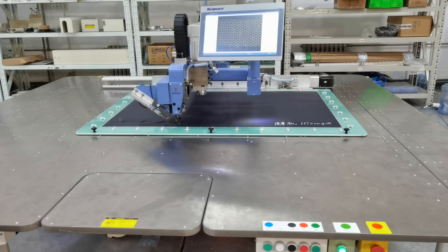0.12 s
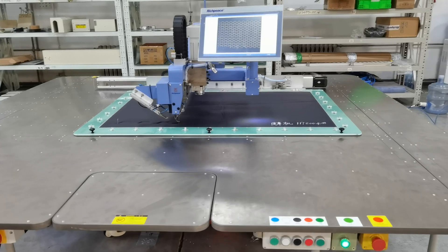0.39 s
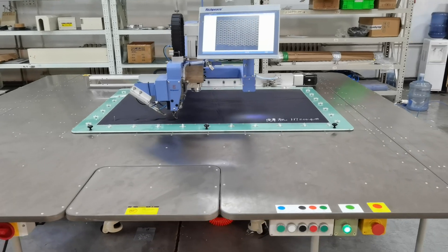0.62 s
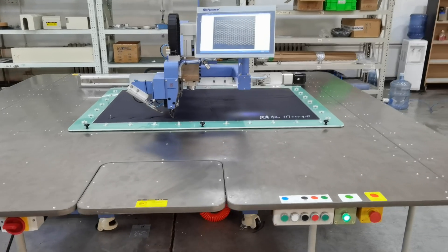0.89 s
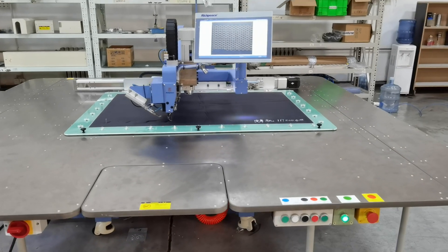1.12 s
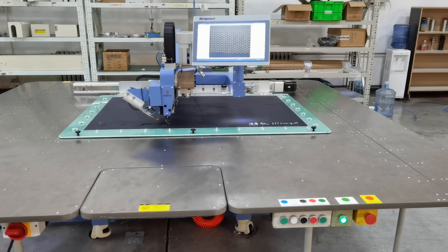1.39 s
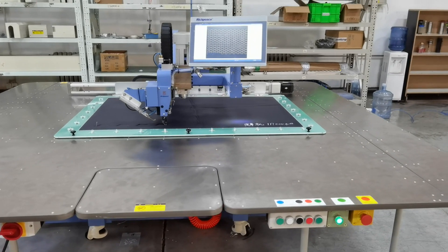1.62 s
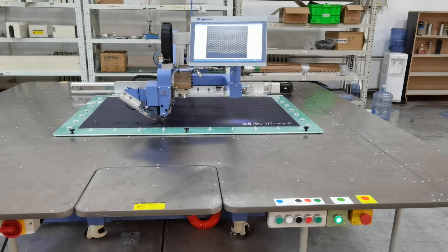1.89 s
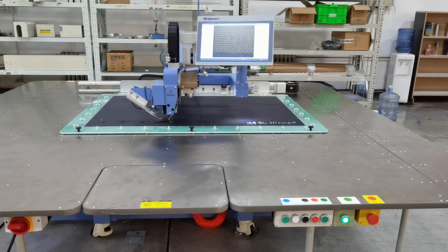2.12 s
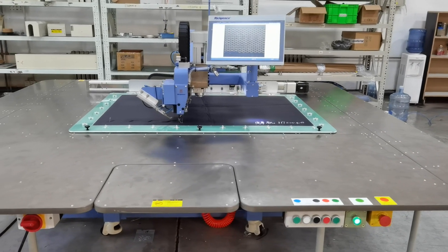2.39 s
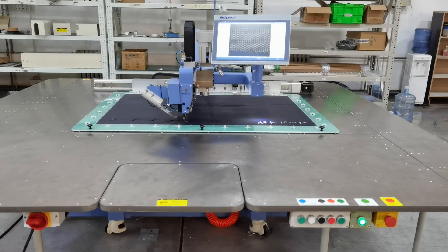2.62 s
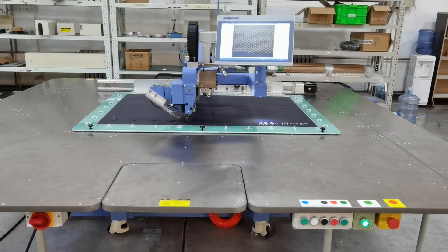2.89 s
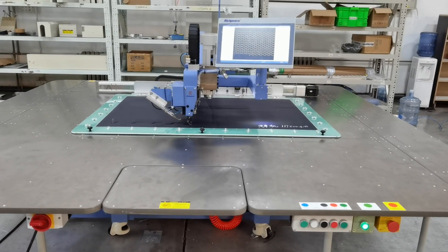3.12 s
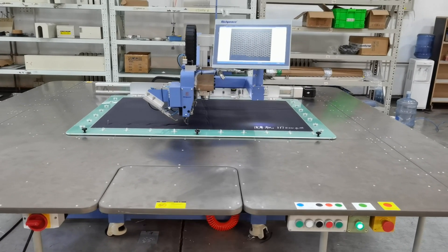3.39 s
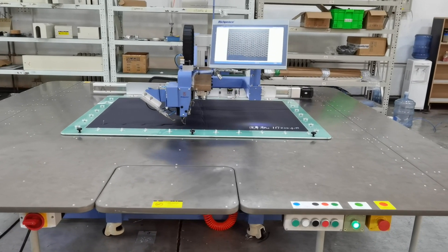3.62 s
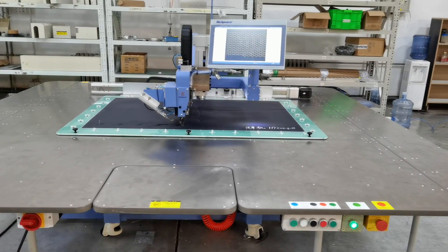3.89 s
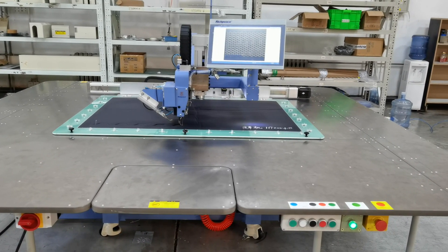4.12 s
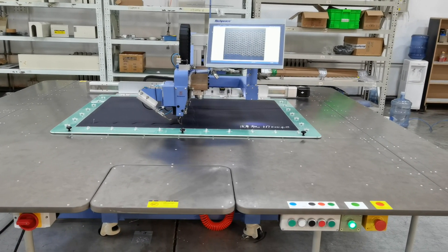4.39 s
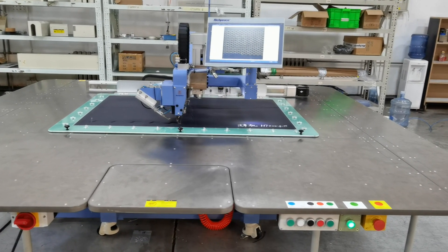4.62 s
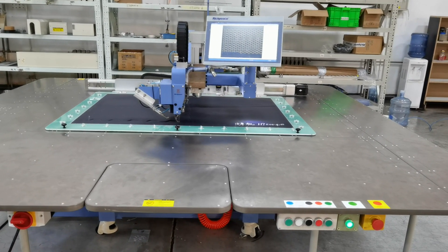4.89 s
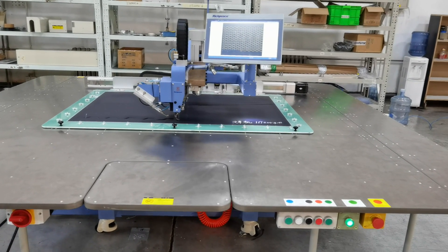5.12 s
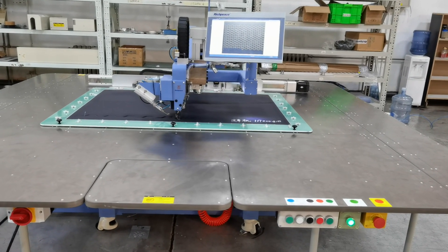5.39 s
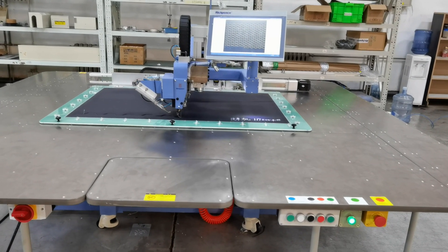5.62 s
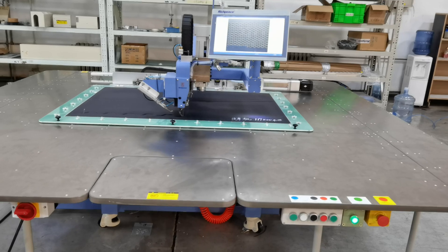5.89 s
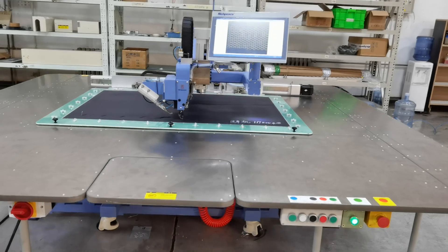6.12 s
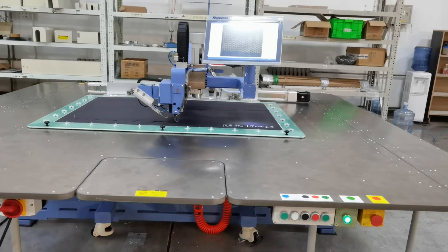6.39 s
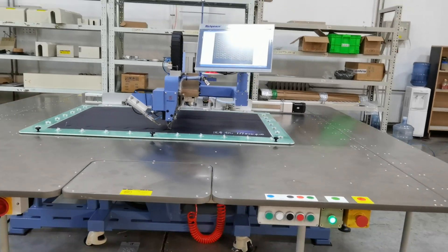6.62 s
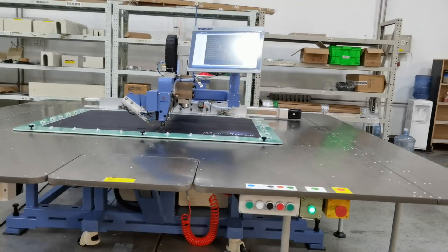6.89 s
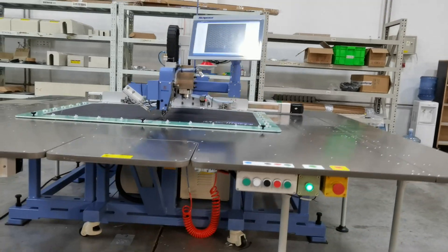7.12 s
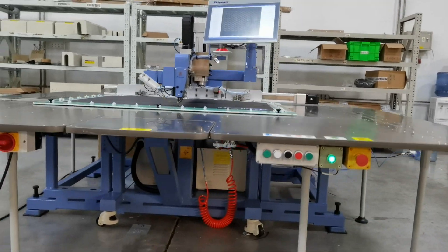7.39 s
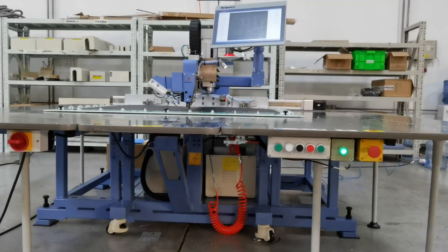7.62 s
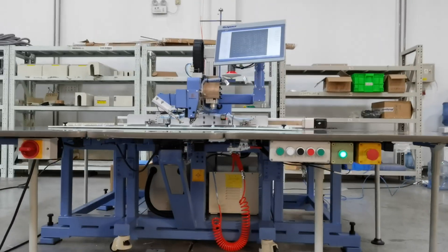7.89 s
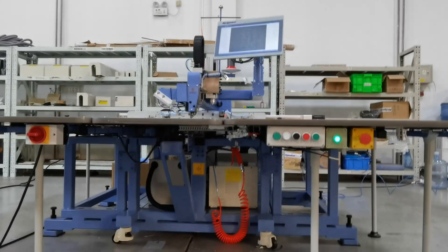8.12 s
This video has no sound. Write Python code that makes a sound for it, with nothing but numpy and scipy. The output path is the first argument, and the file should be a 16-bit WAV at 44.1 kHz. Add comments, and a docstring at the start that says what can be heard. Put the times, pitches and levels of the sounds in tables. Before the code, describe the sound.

A loud, bright compressed-air hiss fills the whole 8.3 seconds, strongest between about 5 and 12 kHz, with a fine fizz above. Beneath it an automatic sewing machine runs at constant speed, its needle knocking about 13 times a second over low gear hum, clatter, midrange whirr and floor rumble. The hiss begins stronger on the right. Near 1.45 a dull thud and thin puff coincide; another puff and a rumble swell come near 2.1. From 1.8 to 2.4 shifting fingers sweep a hollow colour through the hiss. A faint drive whine falls at 3.3; puffs follow near 3.7, 4.15 and 4.8, the last with a low bump. By 4.5 the sound leans left. A whine rises at 5.1, and soft thuds fall near 6.2, 6.8 and 7.5. After 6.5 the direct knocks fade into steel-frame ringing, and the hiss grows duller and quieter. Slight room reverberation.

```python
"""In a workshop, an automatic sewing machine stitches leather; a hand-held two-port microphone drifts about.
Compressed air hisses without pause, as shaped noise with thin bright puffs on top.
The needle bar knocks every turn through resonant steel; gear tones hum on multiples of the same shaft speed.
Rumble, clatter and whirr are shaped noise, the frame drive is a gliding tone, dull thuds are noise bursts.
The fingers that hold the microphone shade each port and throw a short echo into it."""
import sys
import numpy as np
from scipy import signal
from scipy.fft import rfft, irfft, next_fast_len
from scipy.io import wavfile
from scipy.ndimage import uniform_filter1d, map_coordinates

SR = 44100
rng = np.random.default_rng(int(sys.argv[2]) if len(sys.argv) > 2 else 0)


def volts_from_db(level):
    """Convert decibel levels to linear amplitude ratios."""
    exponent = np.asarray(level, float) / 20
    return 10 ** exponent


def wrap_up_sound(samples):
    """Save the sound to the file named by the first command line argument, as 16-bit audio."""
    columns = np.atleast_2d(samples).T
    # keep every value between -1 and 1, then stretch to whole-number steps
    tamed = np.clip(columns, -1, 1)
    steps = np.round(tamed * 32767).astype(np.int16)
    wavfile.write(sys.argv[1], SR, steps)


N = 364266  # samples
SHAFT_HZ = 13.332  # turns a second


def unit(x):
    """Scales a signal to rms 1."""
    return x / np.sqrt(np.mean(x ** 2) + 1e-20)


def along(points, hz):
    """Reads (f/Hz, value) points on a log frequency axis."""
    f, value = np.transpose(points)
    return np.interp(np.log(hz + 1), np.log(f + 1), value)


def curves(rows, t=np.arange(N) / SR):
    """Draws each column after the time as straight lines between its points."""
    s, *columns = np.transpose(rows)
    return [np.interp(t, s, column) for column in columns]


def wobble(rate):
    """A smooth random curve, rate knots a second."""
    knots = rng.standard_normal(int(N * rate / SR) + 4)
    return map_coordinates(knots, [np.arange(N) * rate / SR])


def filtered(x, response):
    """Multiplies the spectrum of x by a complex response of frequency."""
    m = next_fast_len(N + SR // 2)
    return irfft(rfft(x, m) * response(np.fft.rfftfreq(m, 1 / SR)), m)[..., :N]


def rush(spectrum, alike, patchy_db):
    """Stereo noise of rms 1: patches of random gain, then mid and side mixed for the left-right likeness."""
    z = signal.stft(rng.standard_normal((2, N)), nperseg=512)[2]
    patches = uniform_filter1d(rng.standard_normal(z.shape[1:]), size=5, axis=0)
    patches = uniform_filter1d(patches, size=10, axis=1)
    pair = signal.istft(z * volts_from_db(patchy_db * unit(patches)), nperseg=512)[1][:, :N]

    def mid_side(hz):
        turn = np.arccos(np.clip(along(alike, hz), -1, 1)) / 2
        return volts_from_db(along(spectrum, hz)) * [np.cos(turn), np.sin(turn)]

    mid, side = filtered(pair, mid_side)
    return unit(np.array([mid + side, mid - side]))


# how fast the room's answer dies: f/Hz, 60 dB decay/s
ROOM_DECAY = [(200, 0.23), (2000, 0.99), (8000, 0.63)]


def shop(x):
    """The room's answer is decaying stereo noise in which each frequency dies at its own speed."""
    hz, t, z = signal.stft(rng.standard_normal((2, SR // 2)), SR, nperseg=256)
    decay = volts_from_db(-60 * t / along(ROOM_DECAY, hz)[:, None])
    tail = signal.istft(z * decay, SR, nperseg=256)[1]
    late = np.pad(x, (200, 0))[None]  # 200 samples before the room answers
    return signal.fftconvolve(late, tail / np.linalg.norm(tail[0]), axes=1)[:, :N]


# fingers resting near the left, then the right port: t/s, echo share/0-1, echo detour/mm
RESTING = [
    [(0, .3, 71), (.6, .5, 68.5), (1.5, .36, 63), (1.75, .2, 66), (1.8, .4, 113), (2.4, .7, 110),
     (2.8, .62, 119), (3.6, .75, 114), (4.2, .6, 108.5), (6.0, .72, 107), (6.9, .8, 112), (7.6, .72, 112),
     (8.26, .5, 113)],
    [(0, .5, 58), (1.2, .33, 65), (2.15, .6, 54), (3.0, .41, 50.7), (3.65, .6, 45), (4.2, .55, 58),
     (4.42, .5, 58), (4.46, .1, 50), (6.7, .06, 48.5), (8.26, .2, 49)],
]
# a finger comes up to the left port, later one leaves the right: t farthest/s, t nearest/s, extra detour/mm
REACH = [(1.8, 2.36, 190), (4.44, 4.2, 260)]
REACH_CURVE, REACH_FADE = 1.9, 3.0  # exponents: fast when far, slow when near; echo dies at the far end


def fingers(port, t):
    """Echo share and detour at a port: the resting grip plus one finger on the move."""
    share, detour_mm = curves(RESTING[port], t)
    far_s, near_s, extra_mm = REACH[port]
    out = (t - near_s) / (far_s - near_s)  # 0 nearest, 1 farthest
    out = np.where((out > 0) & (out < 1), out, 0)
    return np.clip(share * (1 - out ** REACH_FADE), 0, 1), detour_mm + extra_mm * out ** REACH_CURVE


# what the grip lets through of the jet at each port: t/s, level/dB, brightness/dB per octave
LEFT_GRIP = [(0, -14.5, 3), (.6, -15.5, 7), (1.5, -17.5, 7.5), (2.0, -16.5, 4), (2.4, -18, 5),
             (2.9, -15.5, 0.5), (3.6, -16, -2.5), (4.2, -16, 6), (4.5, -17.5, 1.5), (4.8, -15.5, 1),
             (5.5, -16.5, -5), (6.7, -17, 1), (7.1, -15.5, 1), (7.6, -18, -1.5), (7.8, -21.5, -6.5),
             (8.26, -23, -1.5)]
RIGHT_GRIP = [(0, -13.5, -0.3), (1.5, -13.5, -0.7), (1.8, -15.5, -5), (2.15, -15.5, -1.5),
              (2.4, -19.5, -3.5), (2.9, -19.5, -5.5), (3.3, -17.5, 4), (3.95, -18, -1), (4.3, -19.5, -6.5),
              (5.0, -21, -6), (5.8, -22, -2.5), (6.7, -19.8, -9.5), (7.0, -23, -3.5), (8.26, -23, -6.5)]
# the body of the microphone turns from the machine: t/s, left minus right level/dB
SIDE_SHADE = [(0, -8), (.6, -8), (1.9, -6.5), (2.6, 1), (3.7, 2), (4.5, 10.5), (6.65, 11.5), (7.1, 4.5),
              (8.26, 5)]


def gripped(x, shaded, lag_mm):
    """Each port adds an echo off the fingers; grip level and tilt shade the jet, the body shades the rest."""
    hz, t, z = signal.stft(x, SR, nperseg=512, noverlap=384)
    hz, out = hz[:, None], []

    def above(edge_hz):  # small obstacles let long waves pass
        return hz ** 2 / (hz ** 2 + edge_hz ** 2)

    def delay(mm):  # sound travels 343e3 mm/s
        return np.exp(-2j * np.pi * hz * mm / 343e3)

    # the left port lags by lag_mm; a negative lag puts it ahead
    for port, (grip, late_mm, side) in enumerate(zip((LEFT_GRIP, RIGHT_GRIP), (lag_mm, 0), (.5, -.5))):
        if shaded:
            level_db, tilt_db = curves(grip, t)
            db = level_db + tilt_db * np.log2(np.clip(hz, 4500, 12000) / 8000)
        else:
            db = side * curves(SIDE_SHADE, t)[0] * above(edge_hz=950)
        share, detour_mm = fingers(port, t)
        echo = share * above(edge_hz=3000) * delay(detour_mm)
        out.append(z[port] * volts_from_db(db) * (1 + echo) * delay(late_mm))
    return signal.istft(np.array(out), SR, nperseg=512, noverlap=384)[1][:, :N]


# colour of the low floor noise: f/Hz, relative level/dB per Hz
RUMBLE_COLOUR = [(18, -58), (30, -62), (49, -22), (108, 0), (206, -4.5), (240, -5.5), (300, -14),
                 (390, -23), (660, -120)]
# left-right likeness of the machine noise: f/Hz, likeness/0-1
MACHINE_ALIKE = [(60, 0.91), (270, 0.99), (700, 0.62), (1300, 0.35), (3000, 0.56)]
# the rumble swells: t/s, rise/dB, half length/s
SURGES = [(1.1, 4.5, 0.32), (1.5, 3.5, .15), (2.095, 7, 0.37), (2.552, 6.5, 0.12), (4.2, 4, 0.14),
          (4.78, 6, 0.035), (6.2, 5, 0.29), (7.453, 6, .08)]
RUMBLE_DB, RUMBLE_SAG_DB_PER_S = -51.5, 0.8  # starting level before surges, and its slow fall


def rumble():
    """Low floor noise that sags slowly and surges now and then."""
    t = np.arange(N) / SR
    surge_db = sum(up_db * np.exp(-((t - s) / half_s) ** 2) for s, up_db, half_s in SURGES)
    level_db = RUMBLE_DB - RUMBLE_SAG_DB_PER_S * t + surge_db + 1.1 * wobble(8.2)
    return volts_from_db(level_db) * rush(RUMBLE_COLOUR, MACHINE_ALIKE, patchy_db=2.0)


# colour of the air jet: f/Hz, relative level/dB per Hz
JET_COLOUR = [(2500, -43.5), (3400, -30), (4300, -25), (4820, -20), (5860, -6.5), (6400, -3), (6900, -5),
              (7900, -2.5), (8450, 0.84), (9500, -5), (10500, -6.5), (11500, -16), (12600, -27),
              (13400, -23.5), (15800, -55)]
# thin bright puffs: t/s, length/s, level/dB before a slight lean to the left
PUFFS = [(1.45, 0.16, -33), (2.116, 0.14, -33), (3.676, 0.046, -39), (4.15, .13, -32), (4.775, 0.16, -35),
         (4.93, 0.12, -38), (6.897, 0.056, -41)]
# thin top of the hiss: t/s, level/dB before lift and lean
FIZZ = [(0, -47), (2.1, -43), (2.7, -53), (3.08, -52), (3.35, -41), (4.0, -43), (4.55, -41), (5.1, -44),
        (6.4, -44.5), (7.3, -45.5), (8.26, -53)]
FIZZ_SHADE, FIZZ_LEFT_DB = .6, 1  # share of the body's shade that the fizz takes, and its own lean


def air():
    """A steady jet of noise with a slight flutter, a thin fizz on top and now and then a bright puff."""
    t = np.arange(N) / SR
    flutter_db = 0.15 * wobble(6.8) + 0.16 * wobble(30)
    jet = volts_from_db(flutter_db) * rush(JET_COLOUR, [(8000, 0.62)], patchy_db=1.28)

    gate = 0
    for s, length_s, db in PUFFS:
        ramp = np.minimum(t - s, s + length_s - t) / 0.0067  # 6.7 ms in and out
        gate = gate + volts_from_db(db) * np.clip(ramp, 0, 1)
    puff_colour = [(9500, -40), (11300, -6), (12000, -.1), (12700, -6), (14500, -30)]
    puff = rush(puff_colour, [(8000, .7)], patchy_db=1.5)
    puffs = gate * volts_from_db([[1.5], [-1.5]]) * puff

    lean_db = FIZZ_LEFT_DB + FIZZ_SHADE * curves(SIDE_SHADE)[0]
    fizz_db = curves(FIZZ)[0] + 7.5 + [[.5], [-.5]] * lean_db
    fizz = volts_from_db(fizz_db) * rush([(12500, -37), (14200, 2.0), (16000, -1.5)], [(8000, 0.23)], patchy_db=0.0)
    return gripped(jet, True, lag_mm=-27) + puffs + fizz


# dull bumps: t/s, level/dB before onset and decay, low-pass corner f/Hz
THUDS = [(1.448, -31.5, 900), (4.791, -32, 260), (6.171, -33.5, 800), (6.799, -36, 237), (7.46, -39, 240)]


def thuds():
    """A short burst of noise, low-passed by a soft contact."""
    t, out = np.arange(N) / SR, 0
    for s, db, top_hz in THUDS:
        def band(f):
            return (1j * f / (90 + 1j * f)) ** 2 / (1 + 1j * f / top_hz) ** 2

        noise = unit(filtered(rng.standard_normal(N), band))
        age = np.clip(t - s, 0, None)
        onset = 1 - np.exp(-age / 0.0025)
        out = out + volts_from_db(db - 60 * age / 0.1) * onset * noise  # falls 60 dB in 0.1 s
    return out


# frame drive changes speed, then holds: t/s, glide/s, hold/s, from f/Hz, to f/Hz, peak level/dB before wobble
DRIVE = [(3.3, .16, .36, 440, 372, -44), (5.1, .35, .08, 405, 482, -44.5)]
DRIVE_RISE_DB, DRIVE_FALL_DB = 8, 5  # swell along the glide, fall along the hold


def drive():
    """The frame drive whines in gliding tones that swell up to speed and fade while they hold."""
    t, out = np.arange(N) / SR, 0
    for s, glide_s, hold_s, from_hz, to_hz, db in DRIVE:
        knots = [s, s + glide_s, s + glide_s + hold_s]
        hz = np.interp(t, knots, [from_hz, to_hz, to_hz]) + 3 * wobble(20)
        level_db = np.interp(t, knots, [db - DRIVE_RISE_DB, db, db - DRIVE_FALL_DB]) + 0.86 * wobble(26)
        running = (t > knots[0]) * (t < knots[-1])
        out = out + volts_from_db(level_db) * np.sin(2 * np.pi * np.cumsum(hz) / SR) * running
    return out


# colour of the machine's low clatter: f/Hz, relative level/dB per Hz
CLATTER_COLOUR = [(120, -15), (200, -16), (242, -0.5), (327, -6.5), (625, -3.5), (900, -8), (1170, -51),
                  (1980, -120)]


def clatter(hum_db):
    """Low machine noise that rises and falls with the hum."""
    return volts_from_db(hum_db - 3.0) * rush(CLATTER_COLOUR, MACHINE_ALIKE, patchy_db=2.0)


# colour of the machine's whirr: f/Hz, relative level/dB per Hz
WHIRR_COLOUR = [(500, -22), (850, -7), (1050, -4.5), (1680, -0.5), (2260, 3.5), (2700, -5.5), (3090, -7),
                (3350, -19), (4200, -10.5), (5460, -19), (9240, -120)]


def whirr(whirr_db):
    """Brighter machine noise with a level curve of its own."""
    return volts_from_db(whirr_db) * rush(WHIRR_COLOUR, MACHINE_ALIKE, patchy_db=1.5)


# weaker lines locked to the shaft: order/multiple of shaft speed, relative level/dB
WEAK_LINES = [(14, -9), (19, -5), (22, -9), (28, -4), (30, -8), (35, -8), (37, -6), (46, -9), (47, -8),
              (50, -8), (56, -9), (62, -7), (67, -9), (71, -10), (84, -11), (107, -10)]
# the two strongest lines: t/s, order 18 level/dB, order 36 level/dB, both before trim and wobble
STRONG_LINES = [(0, -53, -42.5), (.6, -46.5, -48), (1.0, -54, -56), (1.8, -48.5, -51.5),
                (2.4, -49.5, -56.5), (2.87, -59, -55), (3.43, -46.5, -61), (5.3, -56.5, -63),
                (6.0, -49, -72), (6.65, -58.5, -62), (8.26, -53, -57)]


def gears(hum_db):
    """The gear train hums in shaft orders: slightly unsteady tones, each swelling on its own."""
    t = np.arange(N) / SR

    def tone(order):
        return np.sin(2 * np.pi * (order * SHAFT_HZ * t + rng.random()) + .3 * wobble(3))

    weak = unit(sum(volts_from_db(db + 3.2 * wobble(1.5)) * tone(order) for order, db in WEAK_LINES))
    low_db, high_db = curves(STRONG_LINES)
    low = volts_from_db(low_db + .5 + 2 * wobble(8)) * tone(18)
    high = volts_from_db(high_db + .5 + 2 * wobble(8)) * tone(36)
    return volts_from_db(hum_db - 5) * weak + low + high


# contacts in one turn: t/share of a turn, mean level/dB
TURN = [(0, -.1), (.029, -8), (.14, -15), (.6, -15)]
# modes of the needle arm: f/Hz, width/Hz, level/dB
ARM = [(940, 140, 5), (1400, 260, 1.5)]
# modes of the steel frame: f/Hz, width/Hz
FRAME = [(650, 50), (1020, 41)]
# knock over the table, then through the frame as the microphone sinks:
# t/s, direct level/dB, low frame ring level/dB, high frame ring level/dB
KNOCK = [(0, -50.5, -55, -72), (1, -47.5, -69, -80), (2, -48.5, -68, -69), (3.4, -44.5, -72, -82),
         (4.5, -49, -74, -72), (5.2, -48.5, -58, -78), (6.0, -53.5, -56, -73), (6.6, -58, -51, -63),
         (6.9, -66, -53, -50), (7.3, -57, -54, -63), (8.26, -59, -61, -63)]
FIRST_STITCH = .0280  # s


def needle():
    """Each turn brings the same contacts, a little stronger or weaker: a short snap that rings arm and frame."""
    blows = np.zeros(N + SR)
    turns = np.arange(int(N / SR * SHAFT_HZ) + 1)
    for share, db in TURN:
        jitter_s = rng.normal(0, .00006, len(turns))
        at_s = FIRST_STITCH + (turns + share) / SHAFT_HZ + jitter_s
        blows[np.round(at_s * SR).astype(int)] = -volts_from_db(db + rng.normal(0, 2.2, len(turns)))
    blows = blows[:N]

    def modes(f, body):
        return sum(volts_from_db(db) * 1j * f * w / (c * c - f * f + 1j * f * w) for c, w, db in body)

    def snap(f):  # one push and pull of air, about a millisecond long
        return (f / 1150) ** 2 * np.exp(-(f / 1150) ** 2)

    direct = filtered(blows, lambda f: snap(f) * (1 + modes(f, ARM)))
    rings = [filtered(blows, lambda f: modes(f, [(c, w, 0)])) for c, w in FRAME]
    return sum(volts_from_db(db) * unit(part) for db, part in zip(curves(KNOCK), [direct, *rings]))


# the machine as the microphone drifts off: t/s, hum level/dB before each layer's trim, whirr level/dB
MACHINE = [(0, -42, -42.5), (1.2, -43.5, -44), (1.5, -40.5, -40.5), (2.2, -45, -39.5), (2.9, -45.5, -38),
           (3.6, -45, -38.5), (4.7, -47, -41.5), (5.8, -45.5, -40.5), (6.1, -44, -42), (7.4, -48, -45),
           (8.0, -45.5, -49), (8.26, -48.5, -47)]


def scene():
    """Machine and floor noise reach the gripped microphone; the room answers tones, knocks and thuds only."""
    hum_db, whirr_db = curves(MACHINE)
    noise = rumble() + clatter(hum_db) + whirr(whirr_db)
    solid = thuds() + drive() + gears(hum_db) + needle()
    room = volts_from_db(-10.5) * shop(solid)
    return air() + gripped(noise + solid + room, False, lag_mm=-14.5)


def low_pass(x):
    """Removes everything above the highest recorded frequency."""
    return signal.sosfilt(signal.butter(12, 16930, fs=SR, output="sos"), x)


TOP_HZ = 15650  # band limit; above it the response falls to nothing within 300 Hz


def record(dry):
    """The microphone chain cuts deep bass, fades out above its band limit and rounds off the highest peaks."""
    def chain(hz):
        bass_cut = (1j * hz / (45 + 1j * hz)) ** 2
        return bass_cut * np.clip((TOP_HZ - hz) / 300 + 1, 0, 1)

    band = filtered(dry, chain)
    rounded = band / (1 + np.abs(band / .95) ** 5) ** (1 / 5)
    return low_pass(rounded)


dry = scene()
out = record(dry)
wrap_up_sound(out)
```